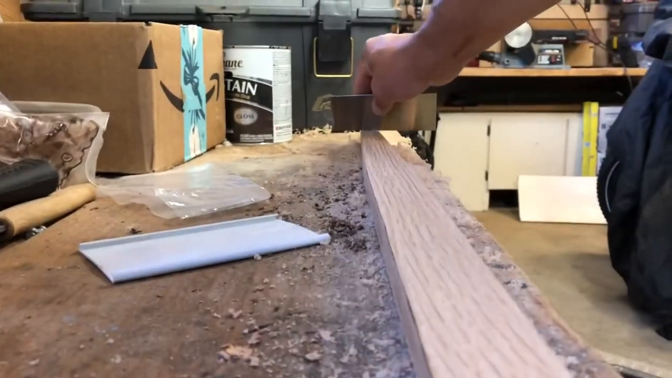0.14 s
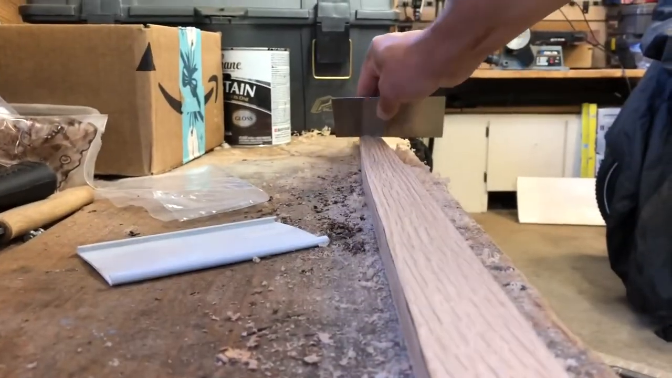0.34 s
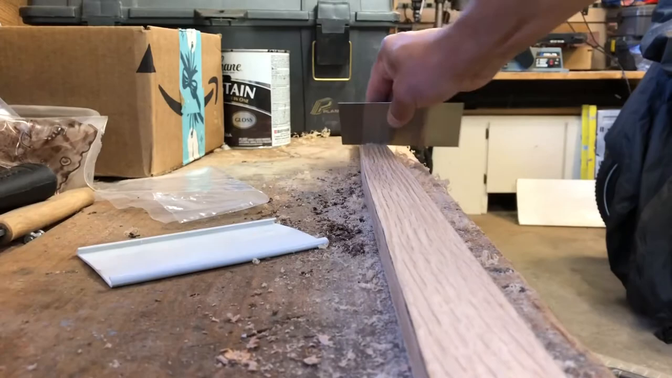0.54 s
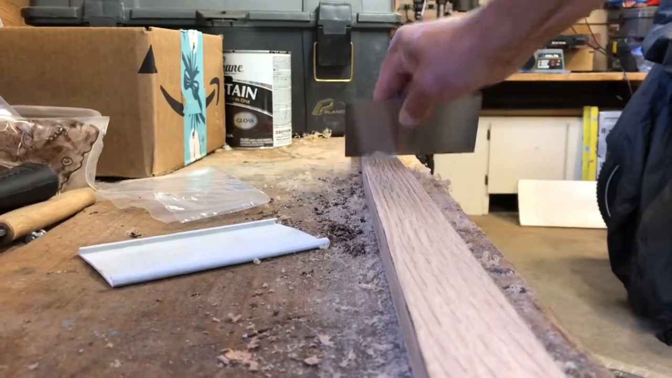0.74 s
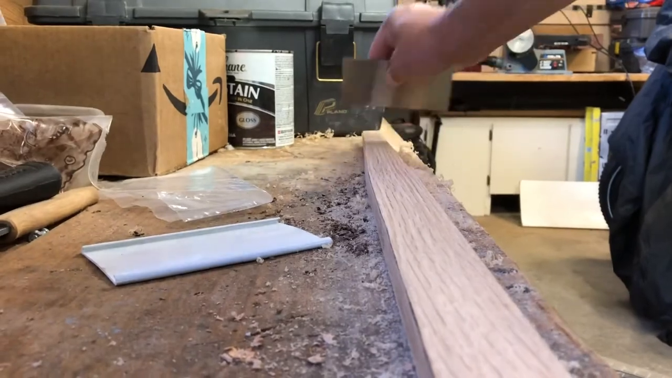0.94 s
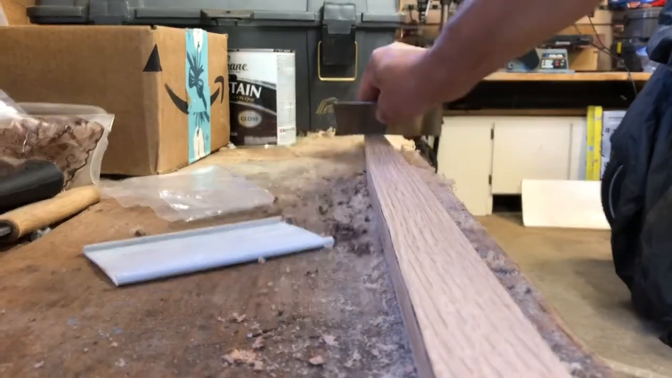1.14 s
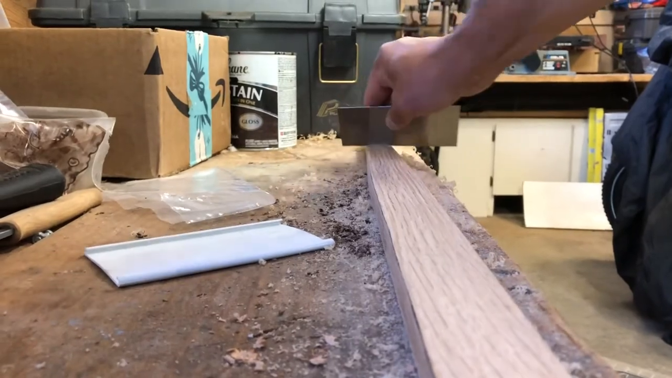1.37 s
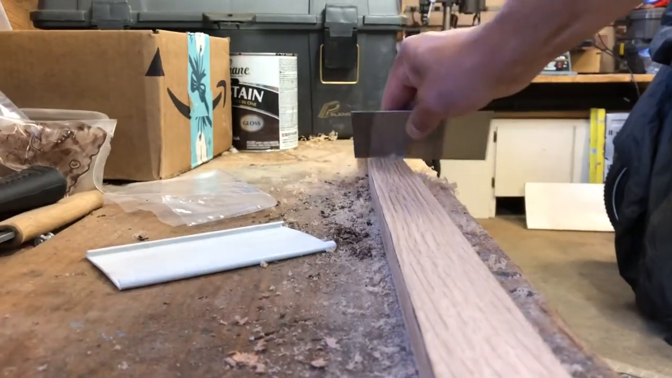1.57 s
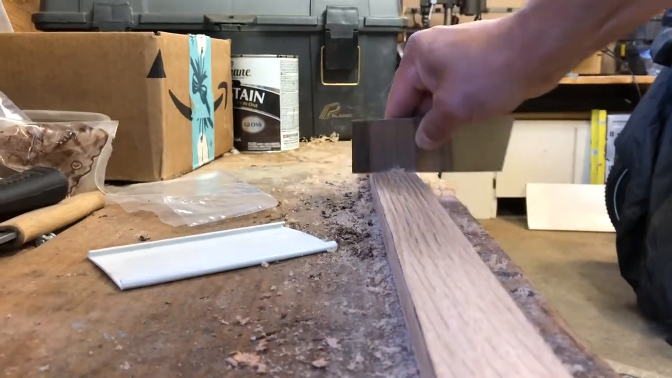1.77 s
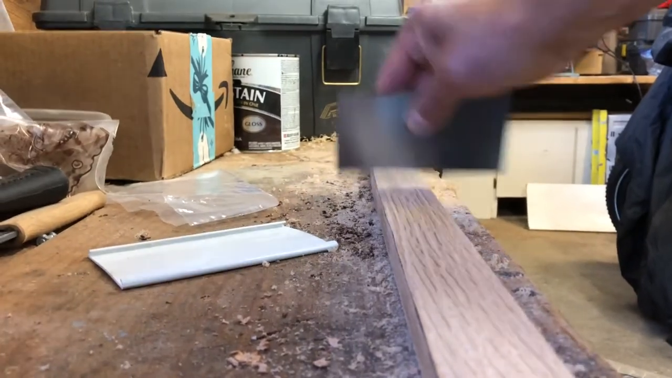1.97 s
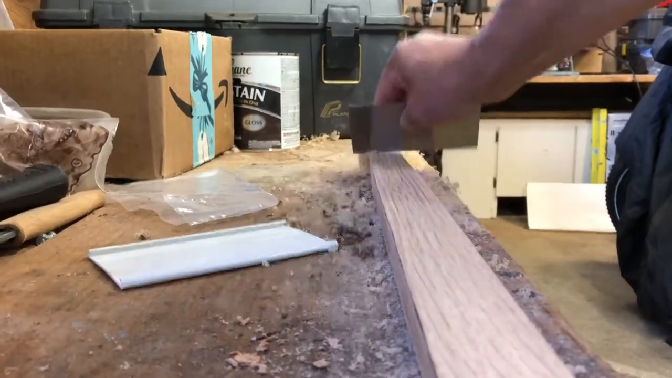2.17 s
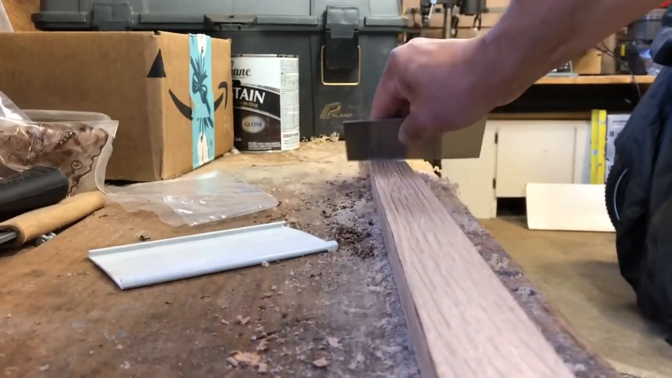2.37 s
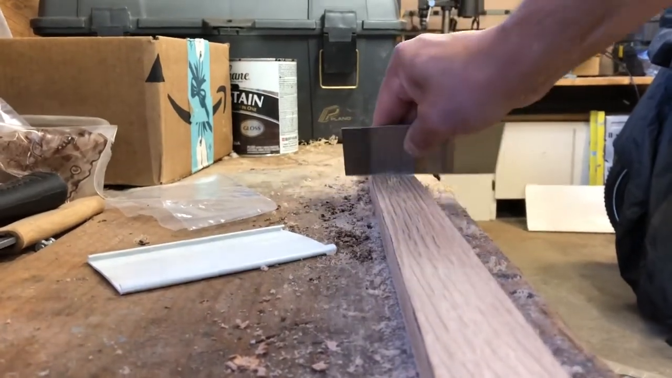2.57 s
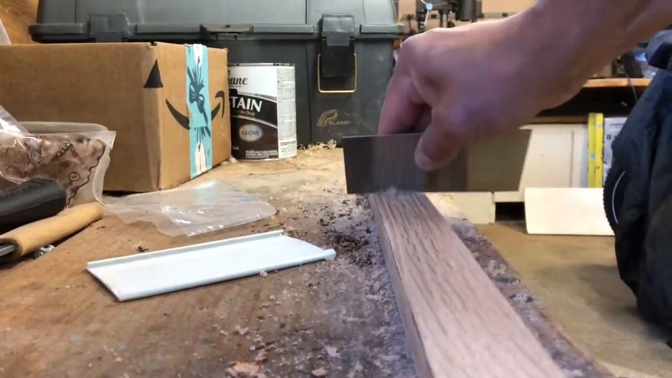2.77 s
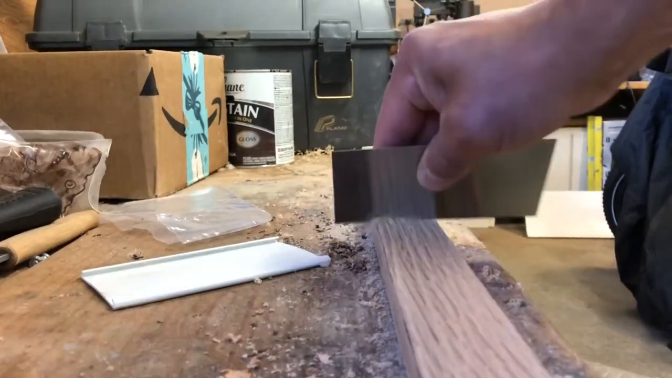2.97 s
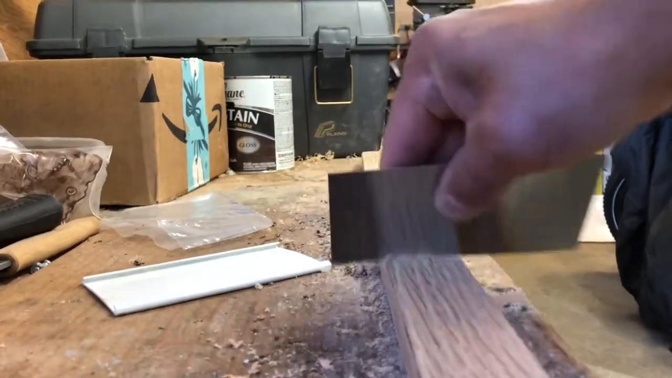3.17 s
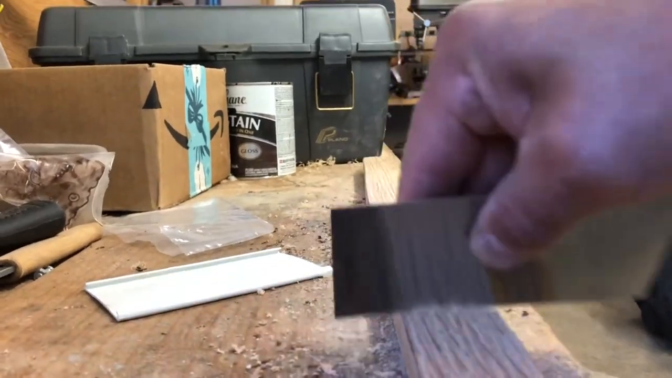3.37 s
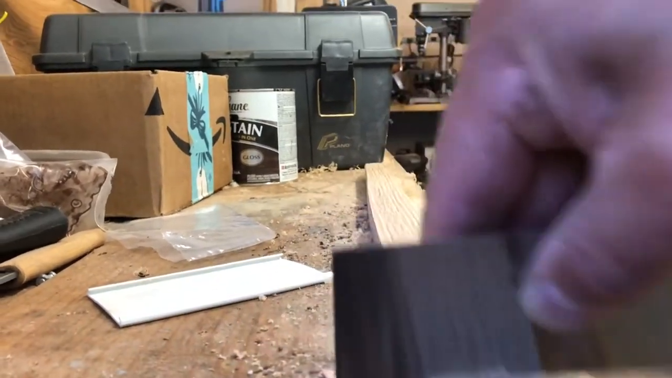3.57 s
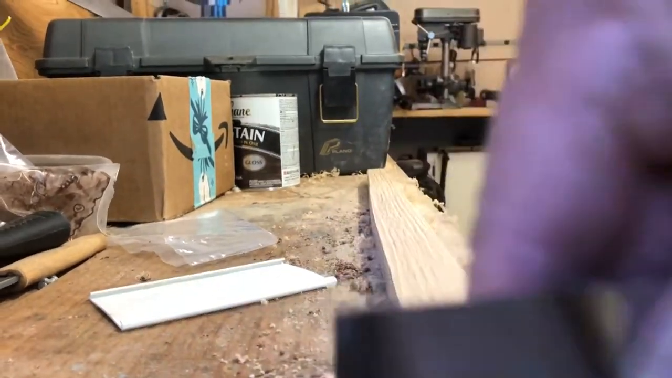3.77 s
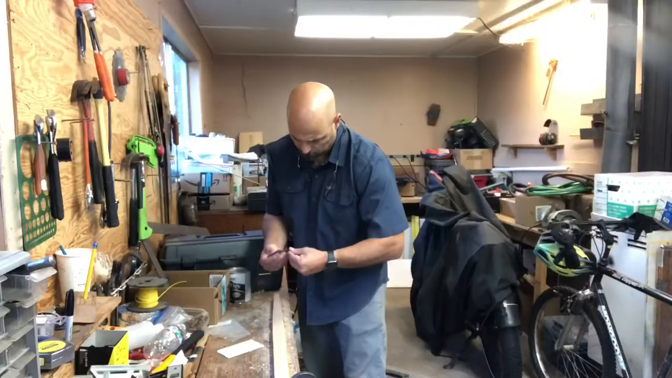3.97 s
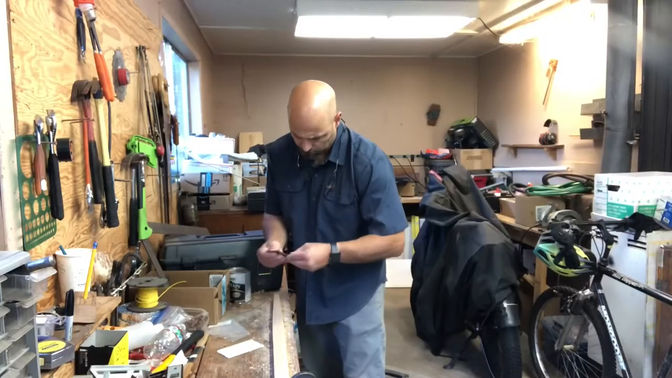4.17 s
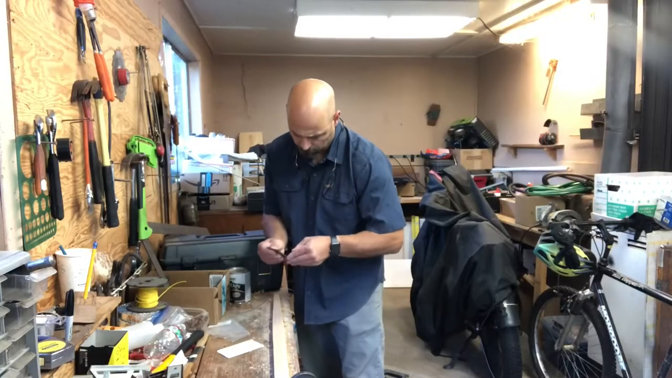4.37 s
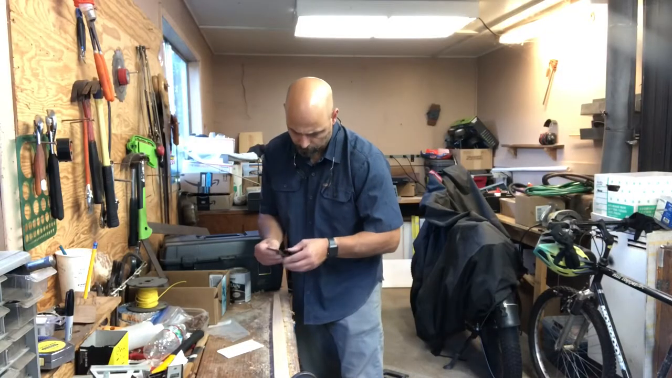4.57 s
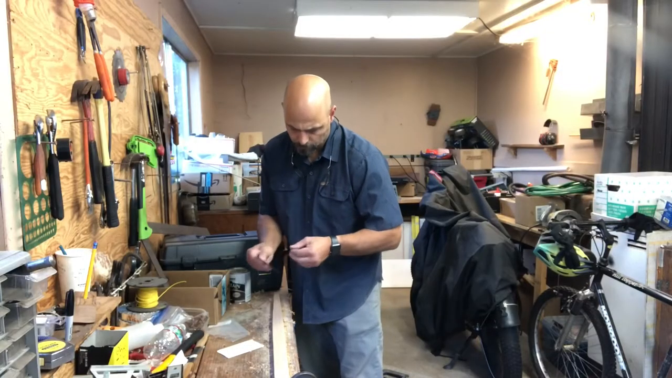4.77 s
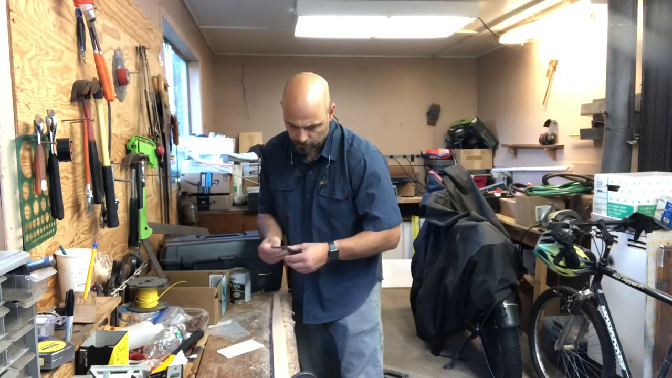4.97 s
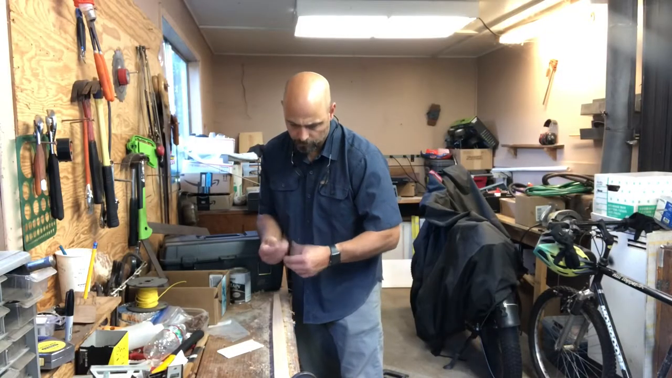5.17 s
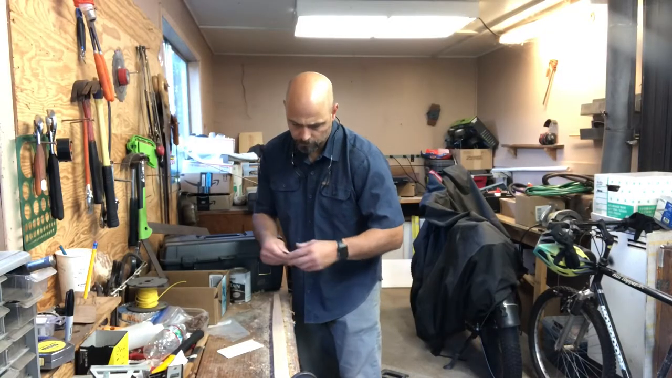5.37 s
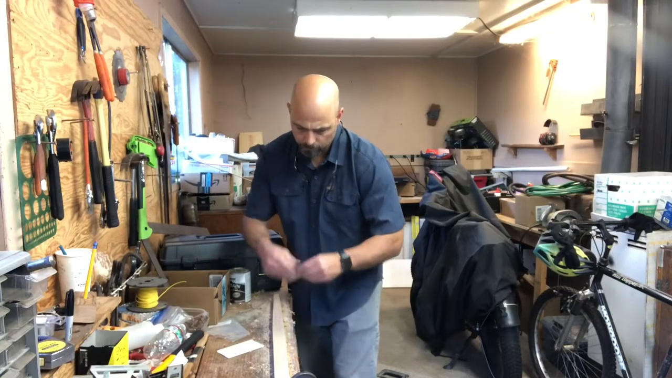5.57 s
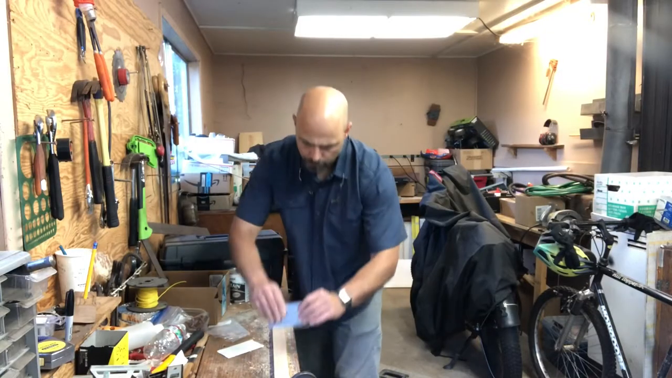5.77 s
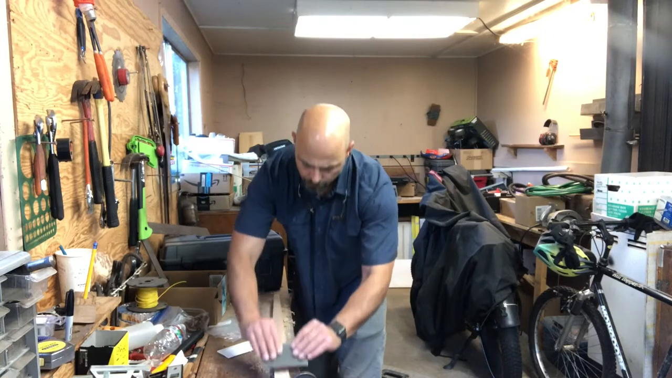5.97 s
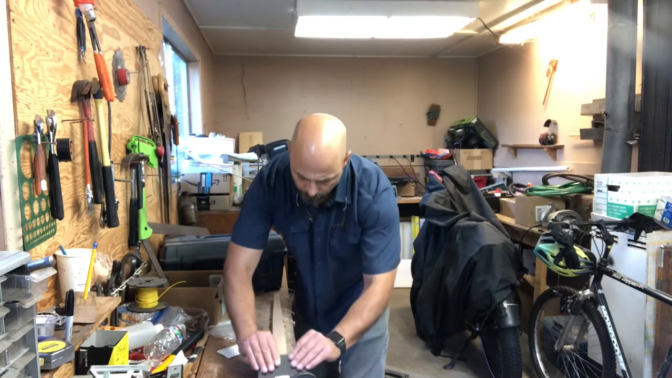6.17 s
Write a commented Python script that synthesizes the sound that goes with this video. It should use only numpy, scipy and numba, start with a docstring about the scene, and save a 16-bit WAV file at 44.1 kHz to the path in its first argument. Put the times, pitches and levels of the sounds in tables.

```python
"""Scraping a hardwood board

A steel card scraper is drawn along the board in three strokes, with knocks of its edge before the last two.
Tearing fibres ring the bowed plate and the board, and the bench shudders; the last stroke swells close.
Then, from across the humming workshop, a thumb flicks the plate's burr and the plate is set on the board.
Noise and random snaps drive resonances; struck parts are sums of fading sine waves."""
import sys
import numpy as np
from scipy import signal
from scipy.fft import rfft, irfft, next_fast_len
from scipy.io import wavfile
from scipy.ndimage import uniform_filter1d
from numba import njit

SR = 44100
rng = np.random.default_rng(int(sys.argv[2]) if len(sys.argv) > 2 else 0)


def log_audio(samples):
    """Write samples as a 16-bit WAV file to the path given in sys.argv[1]."""
    # one column per channel
    frames = np.atleast_2d(samples).T
    # limit to full scale, then quantise
    limited = np.clip(frames, -1, 1)
    pcm = np.round(limited * 32767).astype(np.int16)
    wavfile.write(sys.argv[1], SR, pcm)


N = 274302
TIME = np.arange(N) / SR

# Colour of the rasping or rattling board. Each row: frequency in Hz, level in dB.
BOARD_COLOUR = [(120, -12.5), (330, 0), (480, 0), (700, 2.5), (1150, 0.5), (1700, -2), (2400, -9.5),
                (3300, -20.5), (6000, -43.5)]


def undb(db):
    """Turn decibels into a gain."""
    return 10 ** (np.asarray(db) / 20)


def unit(x):
    """Scale a sound to an rms level of 1."""
    return x / np.sqrt(np.mean(x ** 2))


def colour(x, points):
    """Filter a sound so that its spectrum is shaped by (Hz, dB) points."""
    hz, db = np.transpose(points)
    size = next_fast_len(len(x) + 4096)
    f = np.maximum(np.fft.rfftfreq(size, 1 / SR), 1)
    gain = undb(np.interp(np.log(f), np.log(hz), db))
    return irfft(rfft(x, size) * gain, size)[:len(x)]


def band(x, low_hz, high_hz):
    """Keep the range between two frequencies, with gentle slopes."""
    return signal.sosfilt(signal.butter(1, [low_hz, high_hz], "band", fs=SR, output="sos"), x)


def walk(rate):
    """Slow random wandering around 0, with about `rate` new targets a second and a spread near 1."""
    k = max(int(SR / rate), 1)
    steps = np.repeat(rng.standard_normal(N // k + 1), k)
    return uniform_filter1d(steps, k)[:N]


def swell(s, half_s):
    """A smooth rise to 1 at time s and a fall back."""
    return np.exp(-((TIME - s) / half_s) ** 2)


def surge(s, rise_s, decay_s):
    """An exponential rise to 1 at time s, then an exponential decay."""
    return np.exp(-np.maximum((s - TIME) / rise_s, (TIME - s) / decay_s))


@njit
def svf(x, hz, width):
    """A resonance with a moving centre: a state-variable band-pass filter with gain 1 there."""
    y, b, l = np.empty(len(x)), 0., 0.  # b and l: the band and low states
    for i in range(len(x)):
        g = np.tan(np.pi * min(hz[i], .45 * SR) / SR)
        k = width / hz[i]
        v = (b + g * (x[i] - l)) / (1 + g * (g + k))
        b = 2 * v - b
        l = l + 2 * g * v
        y[i] = k * v
    return y


def sustained(hz, width, hold_s):
    """A resonance fed by friction, which holds its swing steady."""
    once = svf(rng.standard_normal(N), hz, float(width))
    swing = svf(once, hz, 2. * width)
    return swing / np.sqrt(uniform_filter1d(swing ** 2, int(hold_s * SR)))


def ringing(modes, pitch=1):
    """A struck thing for half a second: each (Hz, dB, t60 in s) mode is a sine wave that dies away."""
    t = TIME[:SR // 2]
    total = 0
    for k, (hz, db, t60) in enumerate(modes):
        total = total + (-1) ** k * undb(db - 60 * t / t60) * np.sin(2 * np.pi * hz * pitch * t)
    return total


def at_spot(modes, spot):
    """The weight of each mode depends on where the edge lands."""
    return [(hz, db0 + (db1 - db0) * spot, t60) for hz, t60, db0, db1 in modes]


def add(out, s, x):
    """Mix x into out from time s."""
    i = int(s * SR)
    out[i:i + len(x)] += x[:N - i]


def room(x, t60_low=0.39, t60_high=0.23, first_s=0.0016):
    """Diffuse echo of the cluttered workshop, made of fading noise; the treble dies first."""
    t = TIME[:SR // 2]
    noise = rng.standard_normal(len(t))
    low = signal.sosfilt(signal.butter(2, 4000, fs=SR, output="sos"), noise)
    high = signal.sosfilt(signal.butter(2, 4000, "high", fs=SR, output="sos"), noise)
    tail = low * undb(-60 * t / t60_low) - high * undb(-60 * t / t60_high)
    tail *= np.clip(t / first_s - 1, 0, 1)  # silent until first_s
    return signal.fftconvolve(x, tail / np.sqrt(np.sum(tail ** 2)))[:N]


def bench_echoes(x, share, count=8):
    """Reflections from bench, hand and clutter come and go, so patches of colour drift by."""
    lags = rng.uniform(.0006, .005, count)  # seconds
    echoes = 0
    for lag in lags:
        echoes = echoes + walk(3.5) * np.interp(TIME - lag * (1 + .02 * walk(2)), TIME, x)
    return unit(x + share * echoes)


def fibres(rate, spread_db, patchy_db):
    """Tearing fibres or ridges: dense random snaps, `rate` a second, in stronger and weaker patches."""
    snaps = (rng.random(N) < rate / SR) * rng.standard_normal(N)
    return unit(snaps * undb(spread_db * rng.standard_normal(N) + patchy_db * walk(170)))


def stroke_under_way():
    """Each column of the stroke table, held from the start of one stroke to the next."""
    # The strokes. Each row: start in seconds, length in seconds, attack in seconds, edge hiss in dB,
    # lower plate modes in dB, board rasp in dB, bow of the plate at the start (0-1), bow at the end (0-1),
    # pitch of the board's free end at the start in Hz, seconds until the board's hollow spot.
    strokes = [(-0.04, 0.76, 0.14, -42.5, -41.5, -36.5, 0, 0.14, 1500, 0.64),
               (1.079, 0.81, 0.11, -35, -39, -38, 0, 0.42, 1303, 0.41),
               (2.192, 1.552, 0.056, -36.5, -42, -40, 0.2, 0.8, 724, 0.053)]
    rows = np.array(strokes)
    return rows[np.searchsorted(rows[1:, 0], TIME)].T


def plate(drive, modes, bow, drift, swell_db):
    """Bowing the plate shifts the weight among its modes; the fingers make each wander and swell."""
    total = 0
    for hz, width, flat, bowed in modes:
        gain = undb(flat + (bowed - flat) * bow + swell_db * walk(6.5))
        total = total + gain * svf(drive, hz * (1 + drift * walk(6.5)), float(width))
    return total


def board_rasp(travel, free_hz, hollow):
    """Coarse fibres drive the board: a honk at its hollow spot, a gliding free end, modes with nodes."""
    # The free end rings at odd multiples of its pitch. Each row: width in Hz, level in dB.
    free_end = [(170, -7), (270.7, 4.5), (259.7, 0), (300, -6)]
    # Modes of the board under the edge. Each row: frequency in Hz, width in Hz, level in dB,
    # nodes (still points) passed per second.
    board_modes = [(607, 100, 6.5, 1.1), (830, 61, -2, 1), (1060, 130, 0.5, 1.5), (1270, 48, -4.5, 1.5),
                   (1610, 75, -2, 4), (1950, 410, 7, 2.9)]
    drive = fibres(rate=9000, spread_db=0.0, patchy_db=0.8)
    # over the hollow spot the main mode grows and the rest falls back
    honk_db, hollow_db, hollow_dip_db = -6, 22, 6.5
    honk = undb(honk_db + hollow_db * hollow) * svf(drive, np.full(N, 755.), 66.0)
    rest = undb(-1.0) * drive
    for k, (width, db) in enumerate(free_end):
        gain = undb(db + 1.8 * walk(11))
        rest += gain * svf(drive, (2 * k + 1) * free_hz * (1 + .03 * walk(9)), float(width))
    for hz, width, db, nodes in board_modes:
        # a mode fades as the edge crosses one of its nodes
        shape = 0.062 + np.abs(np.sin(np.pi * (nodes * travel + rng.random())))
        rest += undb(db) * shape * svf(drive, np.full(N, float(hz)), float(width))
    return bench_echoes(colour(honk + undb(-hollow_dip_db * hollow) * rest, BOARD_COLOUR), share=.12)


def singing(sag_per_s=.07):
    """Where the edge grabs in the grain, one mode swells out and sags a little in pitch."""
    # Modes the dragging edge can set singing. Each row: name, frequency in Hz, width in Hz.
    singing_modes = [("board low", 1100, 320), ("board high", 1620, 190), ("plate low", 3310, 370),
                     ("plate high", 3820, 240)]
    # The grabs. Each row: time in seconds, level in dB, half length in seconds, name of the mode.
    grab_list = [(0.19, -42, 0.18, "board low"), (0.516, -40.5, 0.072, "board low"),
                 (0.595, -39.5, 0.078, "plate low"), (0.714, -35.5, 0.022, "plate high"),
                 (1.18, -42.5, 0.03, "board low"), (1.61, -41, 0.091, "plate high"),
                 (1.664, -44, 0.12, "board high"), (2.328, -45.5, 0.082, "plate high"),
                 (2.464, -45.5, 0.06, "plate low"), (2.48, -46.5, 0.14, "board high"),
                 (2.815, -42.5, 0.14, "board low"), (2.922, -44, 0.082, "plate high")]
    out = np.zeros(N)
    for name, hz, width in singing_modes:
        grabs = [(s, undb(db) * swell(s, half_s)) for s, db, half_s, mode in grab_list if mode == name]
        force = sum(size for s, size in grabs)
        # time from the peak of the grab, negative before it
        since = sum(size * (TIME - s) for s, size in grabs) / (force + 1e-9)
        out += force * sustained(hz * (1 - sag_per_s * since), width, hold_s=.04)
    return out


def bench_shudder():
    """The bench trembles at its own pitch under the drag and now and then swings harder."""
    # The harder swings. Each row: time in seconds, level in dB, rise in seconds, decay in seconds.
    shudders = [(0.02, -41.5, 0.043, 0.06), (0.31, -48, 0.043, 0.028), (0.6, -42, 0.054, 0.063),
                (1.1, -35, 0.015, 0.035), (1.405, -37, 0.021, 0.075), (1.8, -52, 0.019, 0.081),
                (2.215, -44, 0.017, 0.026), (3.73, -49.5, 0.026, 0.03)]
    tremble_db = -57.5  # under a steady drag
    steady = sustained(np.full(N, 144.), 22, hold_s=.083)
    swings = sum(undb(db) * surge(s, rise_s, decay_s) for s, db, rise_s, decay_s in shudders)
    return steady * (undb(tremble_db) + swings)


def scraping():
    """Fibres tear under the burr and drive plate, board and bench: strokes bite, grow nearer and lift."""
    # Plate pressed on the wood. Each row: frequency in Hz, width in Hz, dB when flat, dB when bowed.
    low_modes = [(2810, 218.5, -19.5, -2.5), (3360, 460, 0, -7), (3880, 367, 2, 1), (4610, 185, 1, 0),
                 (5170, 510, -0.5, 4.5), (5834, 210, 1.5, 4.5), (6340, 500, -6, 12.5)]
    # Its higher modes. Each row: frequency in Hz, width in Hz, dB when flat, dB when bowed.
    high_modes = [(7590, 250, 2.5, -5.5), (9710, 320, 0, -11.5), (10260, 320, -9, 7), (11400, 250, -9, -2),
                  (12280, 450, -4, -3), (12940, 260, -8, -10.5), (12900, 260, -7.5, -4),
                  (14180, 350, -11.5, -9), (15530, 380, -1.5, 3)]
    # The hand bears down and the burr digs in. Each row: time in seconds, gain in hiss in dB,
    # half length in seconds.
    digs = [(0.276, 2.5, 0.13), (0.703, 7.5, 0.13), (1.705, 0.5, 0.03), (1.864, 5, 0.075),
            (2.724, 0.5, 0.03), (2.938, 3.5, 0.045), (3.158, 3, 0.11), (3.566, 6.5, 0.049),
            (3.741, 9.5, 0.063)]
    set_off_s = 0.024  # the plate gets moving
    bite_db, low_bite_db = 17.5, 10  # hiss and lower modes are held down by this until the burr bites
    approach_db_per_s = 7.5  # the hiss grows as the plate is drawn nearer
    low_growth = 0.51  # dB that the lower plate modes gain per dB of hiss
    hiss_lift_db_per_s, body_lift_db_per_s = 540.5, 339  # falls as the edge lifts
    flat_hz, bow_sag_hz = 9510, 1200  # the plate's strongest mode, and its drop at full bow
    board_fade_db_per_s = 2  # the board speaks less as the edge leaves its loose end
    end_echo = 0.2  # mean share of the wave that comes back, inverted, from the board's end
    round_trip_s_per_s = 0.001025  # that wave takes longer as the edge moves away
    hollow_half_s = 0.18  # half the time to cross the hollow spot

    (start, length, attack, hiss_db, low_db, board_db,
     bow_start, bow_end, free_start_hz, hollow_s) = stroke_under_way()
    travel = TIME - start
    moving = 1 - np.exp(-np.maximum(travel, 0) / set_off_s)
    lifted = np.maximum(travel - length, 0)
    skating = swell(start, attack)
    growth_db = approach_db_per_s * travel + sum(db * swell(s, half_s) for s, db, half_s in digs)
    bow = np.clip(bow_start + (bow_end - bow_start) * travel / length, 0, 1)
    round_trip = .5 / free_start_hz + round_trip_s_per_s * np.maximum(travel, 0)

    drive = fibres(rate=30000, spread_db=-1.0, patchy_db=0.75)
    high = plate(drive, high_modes, bow, drift=0.008, swell_db=2.2)
    high += undb(6.5 * bow + 2 * walk(9.9)) * svf(drive, flat_hz - bow_sag_hz * bow, 460.0)
    high = colour(high + undb(-9.0) * drive, [(4500, -16.5), (7200, -7.5), (16000, -0.5)])

    # the grain lets the returning wave come and go
    returned = np.interp(TIME - round_trip, TIME, drive)
    echoed = drive - end_echo * (1 + .5 * walk(7.7)) * returned
    low = plate(echoed, low_modes, bow, drift=0.022, swell_db=3.0) + undb(-8.5) * echoed
    low = colour(low, [(1200, -26.0), (2400, -7.5), (6900, -10.5), (8500, -16.0)])

    hiss = undb(hiss_db + growth_db - bite_db * skating) * bench_echoes(high, share=.17)
    low_gain = undb(low_db + low_growth * growth_db - low_bite_db * skating)
    lower = low_gain * bench_echoes(low, share=.2)
    hollow = swell(start + hollow_s, hollow_half_s)
    board = undb(board_db - board_fade_db_per_s * travel) * board_rasp(travel, .5 / round_trip, hollow)
    body = lower + board + singing() + bench_shudder()
    edge = undb(-hiss_lift_db_per_s * lifted) * hiss
    dry = moving * (edge + undb(-body_lift_db_per_s * lifted) * body)
    return dry + undb(-12.5) * room(dry)


def workshop(away):
    """Steady air noise and a slightly wavering hum, whose tones differ from place to place."""
    # Colour of the air noise. Each row: frequency in Hz, relative level in dB per Hz.
    air_colour = [(25, -25.5), (45, -10.5), (90, -9), (135, -8.5), (230, -5), (300, -8), (480, -14),
                  (1000, -21), (2000, -31.5), (5000, -34.5), (9000, -39.5), (15500, -45.5)]
    # Mains and motor hum. Each row: frequency in Hz, dB at the bench, dB across the shop.
    hum_tones = [(59.6, -69, -60), (119.8, -66.5, -65), (136, -68, -62.5), (174.5, -65.5, -60.5),
                 (216.8, -61, -57.5), (240, -58.5, -57.5), (359.8, -69.5, -63), (480, -76, -70.5)]
    near_db, far_db = -58, -58.5  # air noise at the bench and across the shop
    air = undb(near_db + (far_db - near_db) * away) * unit(colour(rng.standard_normal(N), air_colour))
    hum = np.zeros(N)
    for hz, near, far in hum_tones:
        gain = undb(near + (far - near) * away + .7 * walk(5))
        turns = np.cumsum(hz * (1 + .0015 * walk(7))) / SR
        hum += gain * np.sqrt(2) * np.sin(2 * np.pi * turns)
    return air + hum


def knocks(clamp_s=0.017):
    """The edge lands or rocks on the board: a steel tick and ring, a short wood ring, a bench boom."""
    # The landings. Each row: time in seconds, level in dB, spot on the board (0-1), brightness in Hz,
    # bench in dB, room in dB, steel ring in dB, pitch factor of the wood.
    landings = [(1.0468, -23, 0.18, 2500, -8, -12, -14.5, 1),
                (2.1432, -18.5, 0.99, 3300, -17, -17, -16, 1.003),
                (5.9998, -36, 0.42, 750, -6, -4.5, -17.5, 1), (6.026, -42.5, 0.7, 500, -8, -4, -20, 1.086),
                (6.06, -53.5, 0.16, 2000, -12, -2, -18, 1.1)]
    # Modes of the struck board. Each row: frequency in Hz, t60 (time to fall 60 dB) in seconds,
    # dB at spot 0, dB at spot 1.
    wood_modes = [(472.3, 0.1356, -3.5, 3), (530, 0.086, -1, -5.5), (633, 0.068, 0.5, -12),
                  (754, 0.041, -2, 6.5), (876, 0.06, 0.5, -4.5), (995, 0.04, 3, -7), (1071, 0.035, -2, 4),
                  (1295, 0.023, -2, 2), (1480, 0.096, -8, -16.5), (1628, 0.048, -3, -2.5),
                  (2087, 0.035, -7, -3.5), (2554, 0.016, -7.5, -8)]
    # Modes of the bench below it. Each row: frequency in Hz, t60 in seconds, dB at spot 0, dB at spot 1.
    bench_modes = [(88.3, 0.5, -15, -13), (117.3, 0.35, -19, -1.5), (146, 0.38, 0.5, -24.5),
                   (269, 0.11, 6, 0.5), (368, 0.12, 4.5, -2)]
    # Modes of the plate as its edge lands. Each row: frequency in Hz, t60 in seconds, level in dB.
    steel_modes = [(1750, 0.06, -1.5), (2370, 0.04, -4), (4040, 0.05, -5.5), (4430, 0.06, -2),
                   (4810, 0.037, -1), (5740, 0.04, -7), (7040, 0.066, -9), (7350, 0.06, -10)]
    tick_colour = [(150, -12), (900, 4), (2000, -5.5), (4300, 0.0), (7000, -11.5), (15000, -29.0)]
    bloom_s = 0.0055  # the heavy bench takes this long to swing up
    out, t = np.zeros(N), TIME[:SR // 2]
    for s, db, spot, bright_hz, bench_db, room_db, steel_db, pitch in landings:
        # the hand's weight settles on the plate and chokes the ring
        choke = 0.12 + 1.31 / (1 + (t / clamp_s) ** 6)
        tick = undb(-4.5) * unit(colour(rng.standard_normal(len(t)), tick_colour)) * np.exp(-t / 0.0054)
        rattle = undb(-6.5) * unit(colour(rng.standard_normal(len(t)), BOARD_COLOUR)) * np.exp(-t / 0.025)
        wood = band(choke * ringing(at_spot(wood_modes, spot), pitch) + rattle, 240, bright_hz)
        steel = undb(steel_db) * ringing([(hz, mode_db, t60) for hz, t60, mode_db in steel_modes])
        boom = undb(bench_db) * (1 - np.exp(-t / bloom_s)) * ringing(at_spot(bench_modes, spot))
        dry = np.zeros(N)
        add(dry, s, undb(db) * (wood + np.sqrt(bright_hz / 2500) * tick + steel + boom))
        out += dry + undb(room_db) * room(dry)
    return out


def thumb():
    """Skin rasps on the burr, catches, then slips off and lets the plate ring; fingers take a new hold."""
    # The flicks. Each row: time of release in seconds, dB at release, dB at the catch,
    # drag in seconds, ring in dB, where the plate is gripped.
    flicks = [(3.944, -50.5, -48.5, 0.011, -1, "corner"), (4.015, -57.5, -67, 0.013, -8, "corner"),
              (4.342, -47, -52, 0.012, 3, "edge"), (4.641, -43, -51, 0.0038, -2, "middle"),
              (5.099, -39.5, -51, 0.0052, 0.5, "end"), (5.404, -60, -68, 0.008, 4, "corner")]
    # Where the fingers can hold the plate, in the order of the level columns below.
    grips = ["corner", "edge", "middle", "end"]
    # Modes of the plate held loosely. Each row: frequency in Hz, t60 in seconds, then dB for each grip.
    plate_modes = [(1790, .18, -1, -24, -20, -16), (2120, .17, 2, -8, -15, -2),
                   (2520, .15, -3, -8, -17, -8), (2970, .3, -9, -20, -9, -2), (3225, .3, -4, -3, -3, -24),
                   (3480, .14, -20, -14, -3, -24), (3690, .22, -9, 0, -12, -6),
                   (4280, .28, -20, -2, -9, -18), (4950, .2, -20, -12, -20, -24),
                   (5380, .16, -20, -20, -4, -24), (5590, .17, -10, -11, -5, -6),
                   (6790, .2, -15, -18, -7, -7), (7350, .2, -17, -19, -14, -15),
                   (9400, .17, -22, -21, -15, -12)]
    # The bent plate splits each mode into a cluster. Each row: pitch factor, level in dB.
    mode_cluster = [(0.98, -11), (1, -1), (1.018, -8)]
    # Colour of skin on steel. Each row: frequency in Hz, level in dB.
    skin_colour = [(300, -15.5), (900, 1), (2200, 0), (3800, -3.5), (6500, -5), (9000, -13), (15500, -11)]
    # Fingers slide to a new hold. Each row: time in seconds, level in dB, half length in seconds.
    slides = [(5.497, -53, 0.047), (5.77, -65.5, 0.62)]
    # Colour of the sliding fingers. Each row: frequency in Hz, level in dB.
    slide_colour = [(250, 6), (600, 3.5), (1300, 1), (2500, -6.5), (5000, -11), (7000, -19.5),
                    (15000, -24.5)]
    catch_s = 0.018  # from the catch to the release
    ridges = fibres(rate=5000, spread_db=1.5, patchy_db=1.5)
    rasp = unit(colour(ridges, skin_colour))
    slide_level = sum(undb(db) * swell(s, half_s) for s, db, half_s in slides)
    dry = slide_level * unit(colour(rng.standard_normal(N), slide_colour))
    for s, db, catch_db, drag_s, ring_db, grip in flicks:
        force = undb(catch_db) * surge(s - catch_s, 0.0075, 0.0054) + undb(db) * surge(s, drag_s, 0.0037)
        held = [(hz, dbs[grips.index(grip)], t60) for hz, t60, *dbs in plate_modes]
        ring = sum(undb(twin_db) * ringing(held, pitch) for pitch, twin_db in mode_cluster)
        # while the thumb still touches it, the plate rings only briefly
        short_ring = (ring * np.exp(-TIME[:len(ring)] / 0.0026))[:SR // 40]
        muted = unit(signal.oaconvolve(rasp, short_ring)[:N])
        dry += force * (1.08 * rasp + 0.87 * muted)
        add(dry, s, undb(db + ring_db - 9) * ring)
    # from across the shop the echo is strong
    return dry + undb(-6) * room(dry)


def scene():
    """Close strokes first, then the wider room."""
    away_s = 3.775  # from here on, heard from across the shop
    away = np.clip((TIME - away_s) / 0.0094 + 1, 0, 1)
    mono = (1 - away) * scraping() + knocks() + thumb() + workshop(away)
    return np.array([mono, mono])


def record(dry):
    """One microphone on both channels, with the deep bass and the top cut off."""
    top_hz = 15720
    lean = signal.sosfilt(signal.butter(4, 42, "high", fs=SR, output="sos"), dry)
    return signal.sosfilt(signal.ellip(12, .2, 80, top_hz, fs=SR, output="sos"), lean)


dry = scene()
out = record(dry)
log_audio(out)
```